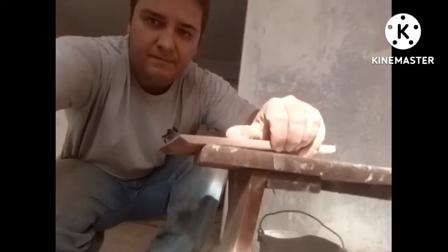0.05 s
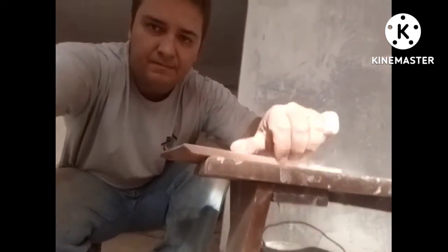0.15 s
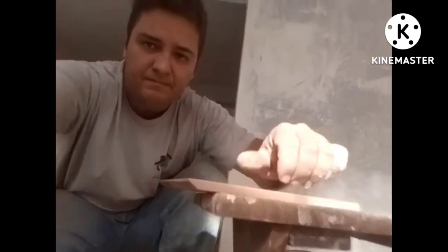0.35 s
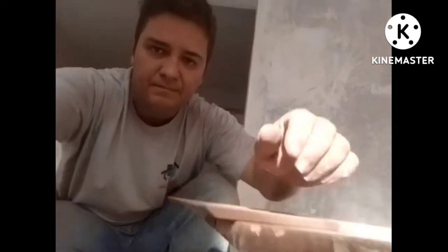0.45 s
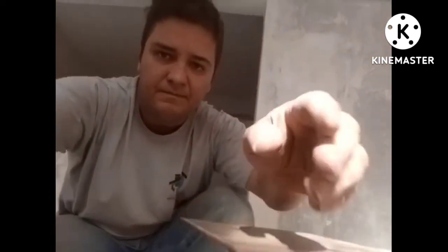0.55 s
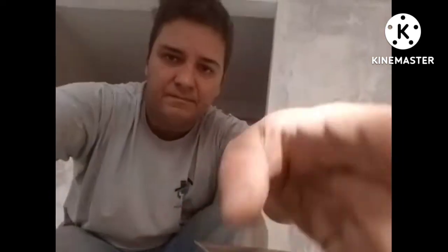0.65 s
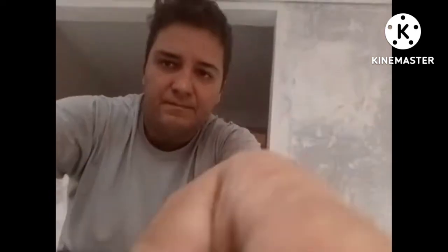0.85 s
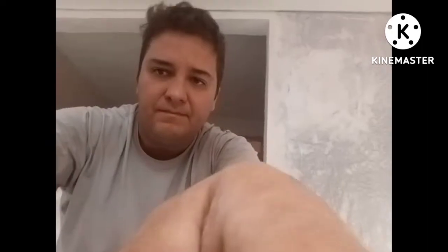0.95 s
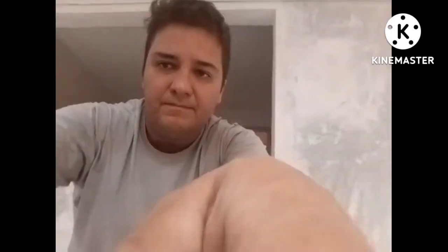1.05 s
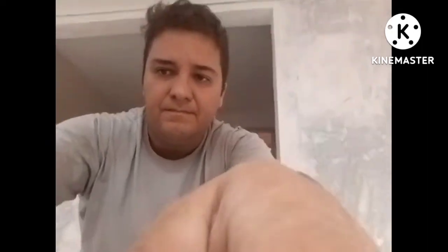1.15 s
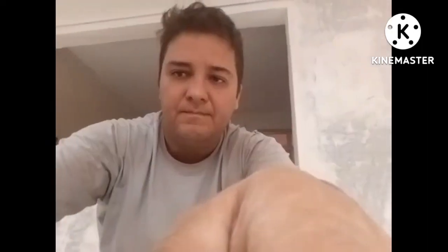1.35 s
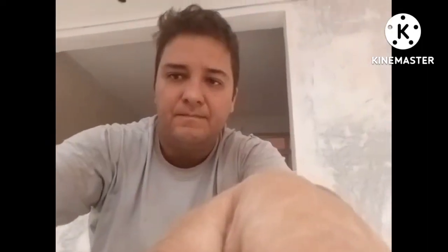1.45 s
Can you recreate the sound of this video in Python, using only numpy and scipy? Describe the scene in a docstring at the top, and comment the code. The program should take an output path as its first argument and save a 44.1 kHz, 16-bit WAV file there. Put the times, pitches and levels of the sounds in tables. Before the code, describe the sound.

A hard tile hits a wooden bench with a sharp clack, a brief clear ring and a low thud, echoing in a bare workshop. Then a hand shifts on the close microphone with soft rustling and a few dry clicks.

```python
"""A hard tile struck on a wooden bench, close to a phone's microphone in a bare, echoing workshop.
The tile cracks, knocks again and rings; its longest-lived mode hangs on as one clear note near 922 Hz.
The bench thuds underneath, and the walls return both for about a second.
Right at the microphone a hand stirs faintly on the phone, then shifts its grip after the blow:
a few dry clicks and a soft rustle over low room tone."""
import sys
import numpy as np
from scipy import signal
from scipy.io import wavfile
from scipy.ndimage import uniform_filter1d

SR = 44100
rng = np.random.default_rng(int(sys.argv[2]) if len(sys.argv) > 2 else 0)


def to_wav(s):
    """Save 16-bit WAV."""
    ch = np.atleast_2d(s).T  # columns
    pcm = np.round(np.clip(ch, -1, 1) * 32767)  # PCM
    wavfile.write(sys.argv[1], SR, pcm.astype(np.int16))


N = 66150

# room tone of the workshop: f/Hz, relative level/dB
ROOM_TONE = [(20, -20), (60, -9.5), (130, -2), (300, -17), (1000, -17), (3000, -24), (8000, -37),
             (15000, -43)]
# rustles: t/s, length/s, scuff level/dB, hiss level/dB, hiss tilt/(dB per octave); the first row is the fading
# echo of an earlier sound in the workshop, the others are the hand rubbing the phone
RUBS = [(-.05, 0.13, -57.5, -71.5, -13.5), (0.049, 0.3, -60.5, -87, -9), (0.939, 0.046, -78, -66.5, -7),
        (1.084, .11, -57.5, -63.5, -5), (1.159, .125, -56.5, -63, 5), (1.245, .065, -66.5, -56.5, 2),
        (1.281, .17, -68, -64, -1.5), (1.443, .05, -71.5, -59, 9)]
# low scuff of skin: f/Hz, relative level/dB
SCUFF_SPECTRUM = [(40, -27.5), (120, -6), (300, -1), (500, -4), (900, -3), (1600, -7.5), (2200, -17.5),
                  (3000, -18), (5000, -32.5), (9000, -49)]
# hiss of skin on the case: f/Hz, relative level/dB
HISS_SPECTRUM = [(500, -29.5), (3000, -3.5), (5000, -5), (6500, 2.5), (8000, -14), (11000, -14),
                 (13700, -16), (14900, -9.5)]
# soft bumps of the hand: t/s, level/dB
BUMPS = [(0, -68), (0.054, -62), (0.144, -65.5), (0.191, -55.5), (1.011, -66.5), (1.106, -60),
         (1.306, -66.5), (1.43, -69)]
# tile contacts: t/s, crack gain/dB, crack tilt/(dB per octave), ring gain/dB,
# most excited f/Hz, spread of the excitation/octaves
CONTACTS = [(0.2185, 0.5, -1.5, -2, 2007, 1.34), (0.2316, -5.5, 1.5, -7, 3000, 2.11),
            (.257, -7, -0.5, -7, 2200, 0.43), (0.2633, -22, -1, 0.5, 880, 0.22)]
# crack of a contact: f/Hz, relative level/dB
CRACK_SPECTRUM = [(40, -44), (130, -9.5), (200, -8), (290, -5.5), (420, -9), (650, 2.5), (1000, 0),
                  (1900, 3.5), (2250, -6.5), (3100, -7), (4100, -2), (5300, -24.5), (6800, -25),
                  (8600, -48.5), (13000, -56.5), (15000, -52.5)]
# modes of the tile: f/Hz, relative level/dB, t60/s
TILE_MODES = [(526.7, -10.5, 0.22), (648, -21, 0.38), (743, -21.5, .4), (862, -30, 0.27), (904.3, -11, .3),
              (921.95, -15.5, 1.06), (972, -22.5, 0.17), (1033, -21.5, 0.13), (1371, -17, 0.14),
              (1990, -18, 0.11), (2018.3, -23, .2), (2415, -29, 0.17), (2459.3, -17.5, .18),
              (2892, -26.5, 0.16), (3280, -30.5, 0.072), (3924, -33, 0.21), (3946, -33.5, 0.28),
              (4640, -34.5, .15), (5108, -24, .1), (5550, -25.5, .1), (5631, -30.5, .1), (6320, -33.5, .18),
              (6331, -33.5, .18), (6900, -35, 0.12), (7170, -43.5, .14), (7880, -46.5, .14),
              (9220, -56, .1), (9808, -50, 0.15), (10750, -55, .1), (11100, -50, .1)]
# ring reaching the microphone straight from the tile: f/Hz, level against the reverberation/dB
RING_DIRECT = [(500, 2), (900, 4), (2000, 1), (5000, 0)]
# thuds of the bench: t/s, direct level/dB
THUDS = [(0.221, -46.5), (.305, -38.5)]
# modes of the bench: f/Hz, relative level/dB, t60/s
BENCH_MODES = [(81.1, -5, .4), (114, -0.5, 0.4), (153, 4, .45), (182, -10, 1)]
# reverberation of the workshop: f/Hz, t60/s
ROOM_DECAY = [(80, 0.69), (220, 1.51), (560, 0.99), (1500, 0.91), (2400, 1.026), (3900, 0.89), (6000, .74),
              (10000, 0.78), (15000, .3)]
# dry clicks on the phone: t/s, level before the low-pass/dB, f/Hz, rise and fall time/s, cutoff/Hz
CLICKS = [(1.105, -23, 500, 0.00025, 4700), (1.2797, -46.5, 4396, 0.00061, 9000),
          (1.408, -37.5, 1170, 0.00041, 1790)]

TIME = np.arange(N) / SR


def amp(db):
    """Decibels to gain."""
    return 10 ** (np.asarray(db) / 20)


def unit_rms(x):
    """Scales to rms 1."""
    return x / np.sqrt(np.mean(x ** 2) + 1e-20)


def burst(x, window_s=0.1):
    """Scales a dying sound to the energy of rms 1 held for the window."""
    return x / np.sqrt(np.sum(x ** 2) / (window_s * SR) + 1e-20)


def read(points, hz):
    """Reads a table on a log-frequency axis."""
    f, value = np.transpose(points)
    return np.interp(np.log(hz + 1), np.log(f + 1), value)


def add(mix, s, sound):
    """Mixes a sound in at s seconds."""
    at = round(s * SR)
    sound = sound[max(-at, 0):]
    part = mix[max(at, 0):][:len(sound)]
    part += sound[:len(part)]


def colour(x, spectrum, tilt_db=0):
    """Minimum-phase filter with the given spectrum, tilted about 1 kHz."""
    hz = abs(np.fft.fftfreq(4096, 1 / SR))
    octaves = np.log2(np.maximum(hz, 200) / 1000)
    log_gain = np.log(amp(read(spectrum, hz) + tilt_db * octaves))
    taps = np.fft.ifft(np.exp(np.conj(signal.hilbert(log_gain)))).real
    return signal.fftconvolve(x, taps[:len(taps) // 2])[:len(x)]


def decay(t60):
    """Envelope falling 60 dB in t60 seconds."""
    return np.exp(-np.log(1000) * TIME / t60)


def mode(hz, t60, rise_s, phase_turns=0):
    """One resonance: a sine that swells and dies away."""
    rise = 1 - np.exp(-TIME / rise_s)
    return rise * decay(t60) * np.sin(2 * np.pi * (hz * TIME + phase_turns))


def at_microphone(x, walls, direct_db, room_db=0):
    """A sound's direct path plus its reverberation, each at its own level."""
    reverberation = signal.fftconvolve(x, walls)[:N]
    return amp(direct_db) * burst(x) + amp(room_db) * burst(reverberation)


def room_tone(level_db=-65.5):
    """The quiet workshop: a steady, low noise."""
    return amp(level_db) * unit_rms(colour(rng.standard_normal(N), ROOM_TONE))


def hand_rubs(grain_db=1.0):
    """Rustles at the microphone, each stroke a grainy scuff and hiss: the opening one is the fading echo of an
    earlier sound in the workshop, the others are skin sliding on the case."""
    out = np.zeros(N)
    for s, length, scuff_db, hiss_db, tilt_db in RUBS:
        noise = rng.standard_normal(N)
        roughness = unit_rms(uniform_filter1d(rng.standard_normal(N), size=90))
        grains = noise * amp(grain_db * roughness)
        scuff = amp(scuff_db) * unit_rms(colour(grains, SCUFF_SPECTRUM))
        hiss = amp(hiss_db) * unit_rms(colour(grains, HISS_SPECTRUM, tilt_db))
        stroke = np.sin(np.pi * np.minimum(TIME / length, 1))
        add(out, s, stroke * (scuff + hiss))
    return out


def hand_bumps():
    """The hand nudges the phone: one low, damped tone each time."""
    out = np.zeros(N)
    bump = burst(mode(hz=123, t60=0.14, rise_s=0.01))
    for s, db in BUMPS:
        add(out, s, amp(db) * bump)
    return out


def tile(walls, crack_db=-22.5, ring_db=-8.5):
    """Close by, each contact gives a short crack of noise and rings the tile's modes."""
    out = np.zeros(N)
    rings = [at_microphone(mode(hz, t60, rise_s=0.00062), walls, read(RING_DIRECT, hz))
             for hz, _, t60 in TILE_MODES]
    for s, crack_gain_db, tilt_db, ring_gain_db, centre_hz, spread in CONTACTS:
        crack = colour(rng.standard_normal(N) * decay(t60=0.028), CRACK_SPECTRUM, tilt_db)
        add(out, s, amp(crack_db + crack_gain_db) * at_microphone(crack, walls, direct_db=-8))
        for (hz, mode_db, _), ring in zip(TILE_MODES, rings):
            excitation = 1 / (1 + (np.log2(hz / centre_hz) / spread) ** 2) ** 2
            add(out, s, amp(ring_db + ring_gain_db + mode_db) * excitation * ring)
    return out


def bench(walls):
    """The wooden bench booms in its low modes under the blow and as the tile settles."""
    out = np.zeros(N)
    for s, level_db in THUDS:
        boom = sum(amp(db) * mode(hz, t60, rise_s=0.008, phase_turns=rng.random())
                   for hz, db, t60 in BENCH_MODES)
        add(out, s, amp(level_db) * at_microphone(boom, walls, direct_db=0, room_db=-9.5))
    return out


def wall_reflections(gap_s=0.006, build_s=0.0099):
    """Impulse response of the bare walls: dense reflections, each band dying at its own speed."""
    hz, t, bands = signal.stft(rng.standard_normal(N), SR, nperseg=256)
    fade = amp(-60 * t / read(ROOM_DECAY, hz)[:, None])
    tail = signal.istft(bands * fade, SR, nperseg=256)[1][:N]
    return tail * np.clip((TIME - gap_s) / build_s, 0, 1)


def phone_clicks():
    """The grip shifts: dry clicks at the microphone, each a low-passed spike of square wave."""
    out = np.zeros(N)
    for s, db, hz, width_s, cutoff_hz in CLICKS:
        envelope = np.exp(-abs(TIME - s) / width_s)
        square = -np.sign(np.sin(2 * np.pi * hz * (TIME - s)))
        lowpass = signal.butter(6, cutoff_hz, fs=SR, output="sos")
        out += amp(db) * signal.sosfilt(lowpass, envelope * square)
    return out


def scene():
    """One microphone: tile and bench with the workshop's echo, the hand dry, room tone behind."""
    background = room_tone()
    walls = wall_reflections()
    blow = tile(walls) + bench(walls)
    hand = hand_rubs() + hand_bumps() + phone_clicks()
    return (background + blow + hand)[None]


def record(dry, threshold_db=-13, ratio=2.3, release_db_per_s=80, top_hz=15650):
    """A limiter holds down the blow; a steep low-pass then cuts the highest treble."""
    power_db = 10 * np.log10(abs(uniform_filter1d(dry[0] ** 2, size=200)) + 1e-12)
    release_db = TIME * release_db_per_s
    envelope_db = np.maximum.accumulate(power_db + release_db) - release_db
    over_db = np.maximum(envelope_db - threshold_db, 0)
    limited = dry / amp((1 - 1 / ratio) * uniform_filter1d(over_db, size=100))
    lowpass = signal.firwin(511, top_hz, window=("kaiser", 9), fs=SR)
    return signal.oaconvolve(limited, lowpass[None], "same")


dry = scene()
out = record(dry)
to_wav(out)
```